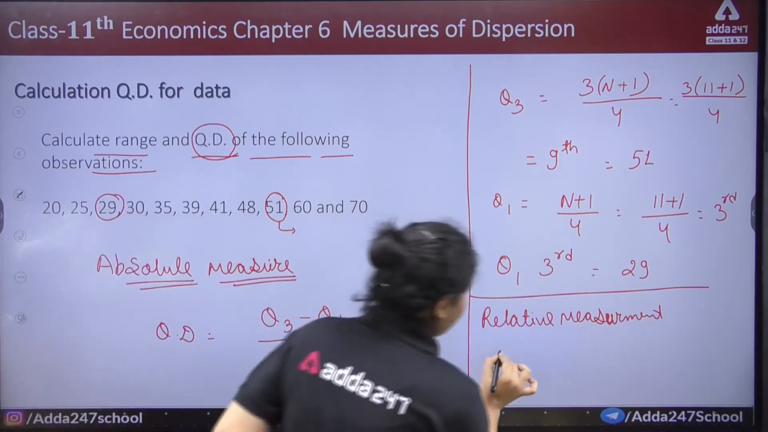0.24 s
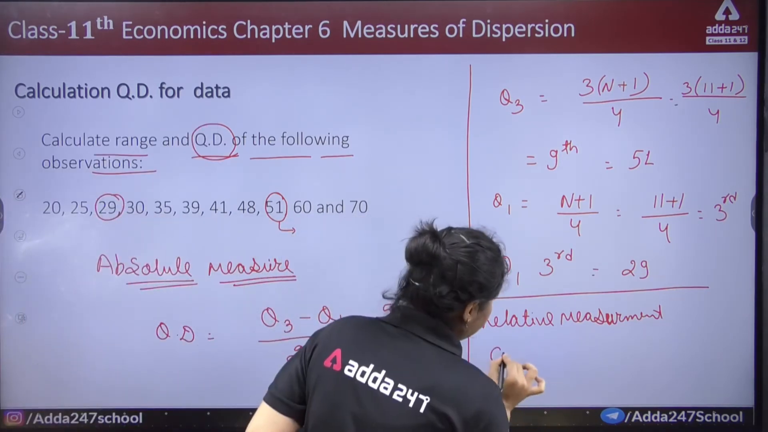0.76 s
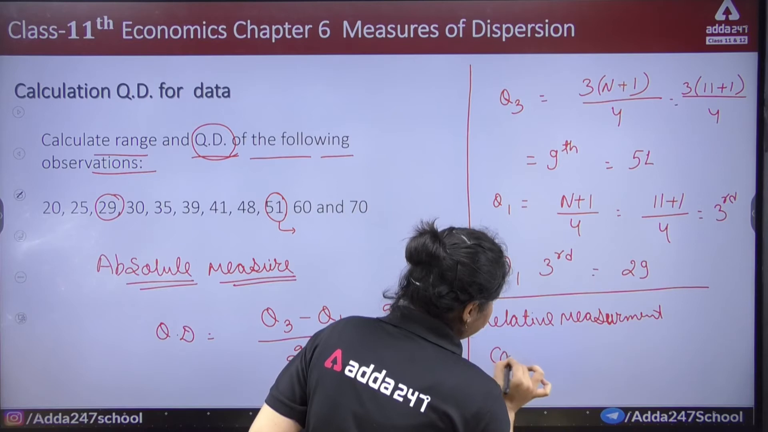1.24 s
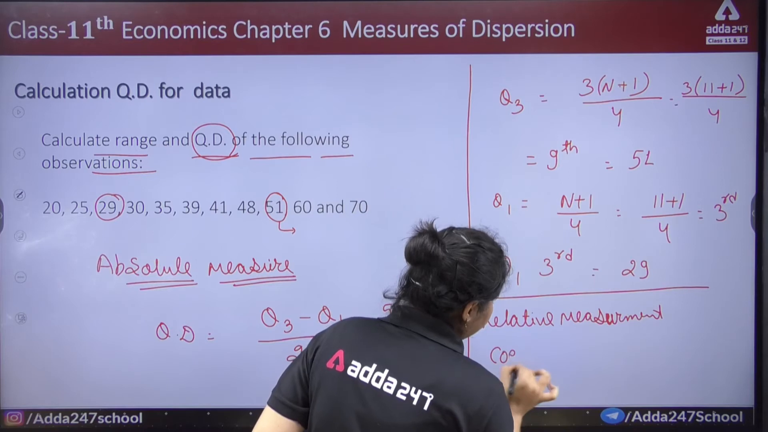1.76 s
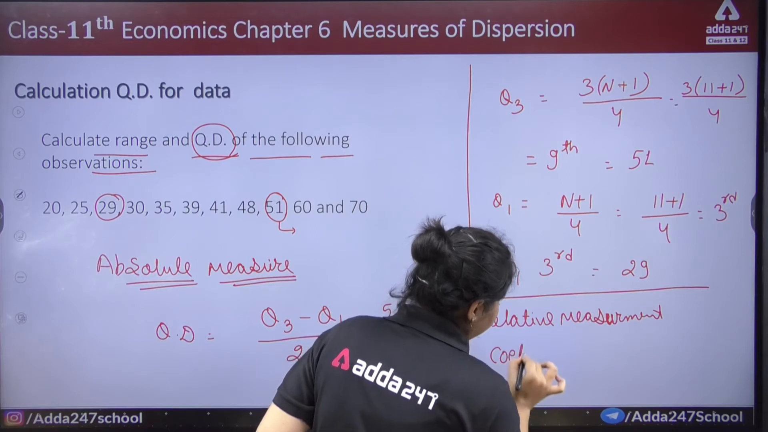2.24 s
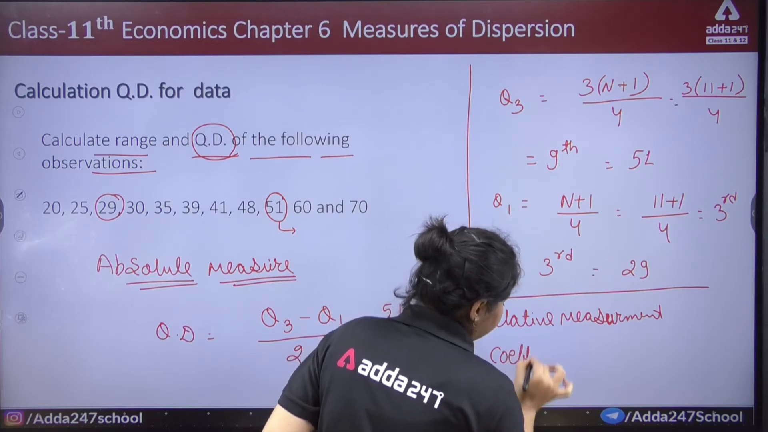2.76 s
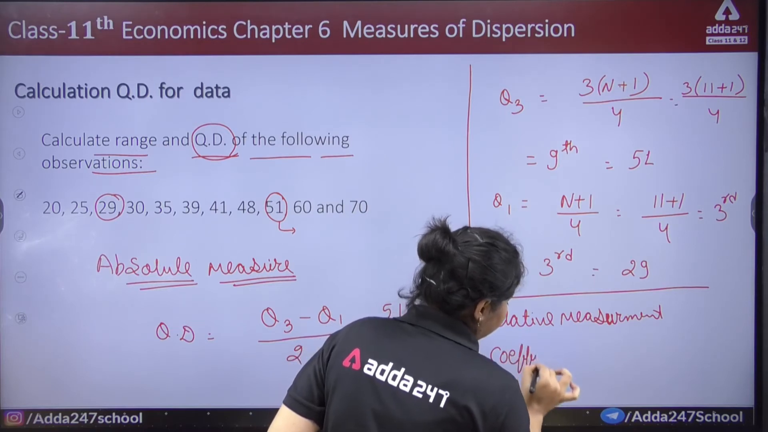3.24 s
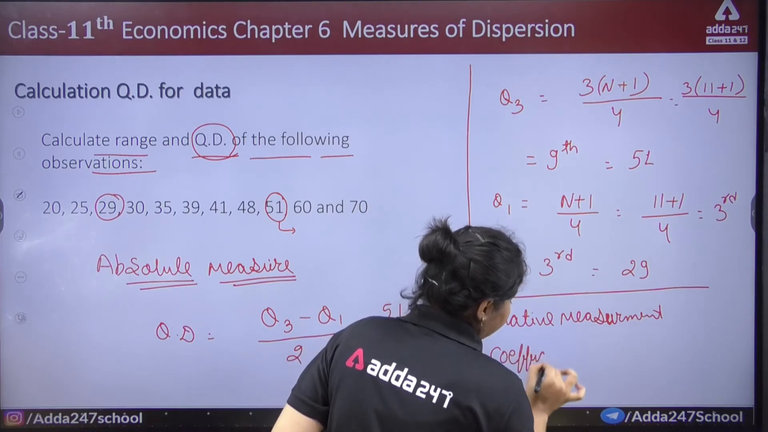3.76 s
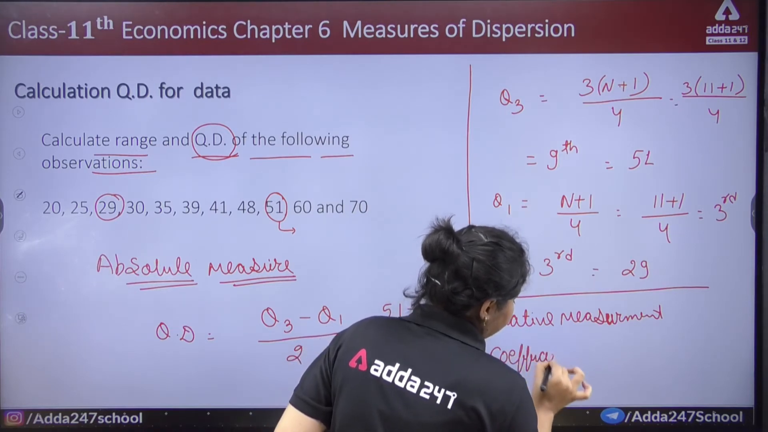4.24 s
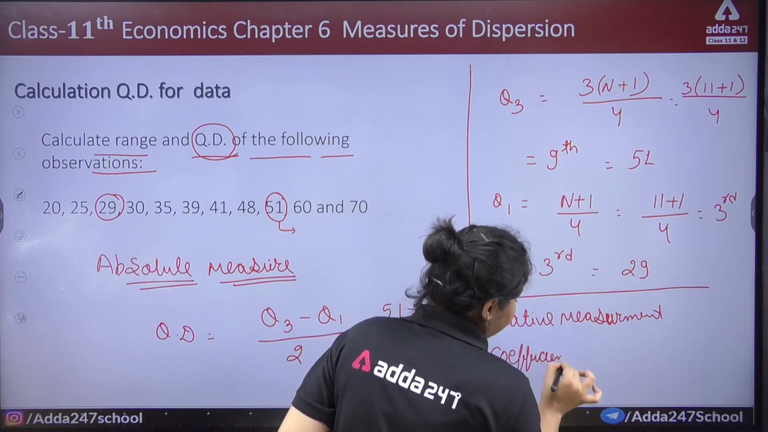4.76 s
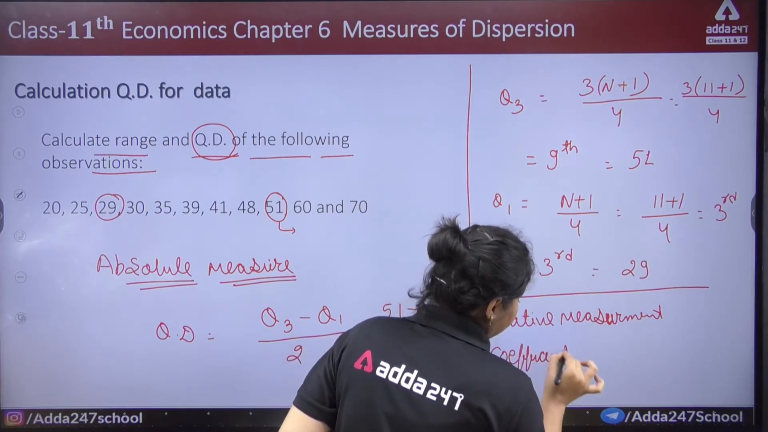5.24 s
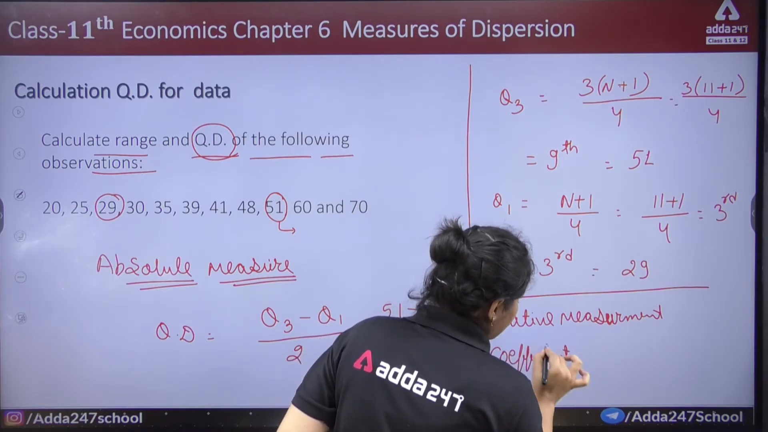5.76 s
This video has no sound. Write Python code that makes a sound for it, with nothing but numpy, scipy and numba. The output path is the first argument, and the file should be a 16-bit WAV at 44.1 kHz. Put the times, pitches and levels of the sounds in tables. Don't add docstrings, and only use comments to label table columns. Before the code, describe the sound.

Faint dry pen drags open over mains hum and airy fan noise, with a few hollow tip taps and a low hand bump on a board panel. From about two seconds, quick up and down strokes hiss brightly, first stronger, then lighter. A far faint horn sounds briefly. Crisp snaps and knocks end it, in a small room heard by one microphone.

```python
import sys
import numpy as np
from scipy import signal
from scipy.fft import rfft, irfft
from scipy.io import wavfile
from scipy.ndimage import uniform_filter1d
from numba import njit

SR = 44100
rng = np.random.default_rng(int(sys.argv[2]) if len(sys.argv) > 2 else 0)


def attenuation_scalar(level_db):
    decades = np.asarray(level_db, float) / 20
    return 10 ** decades


def wav_out(sig):
    wavfile.write(sys.argv[1], SR, np.round(np.clip(np.atleast_2d(sig).T, -1, 1) * 32767).astype(np.int16))


N = 264600
T = np.arange(N) / SR

# level/dB rms, phase/rad
HUM = [(-38, -0.093), (-57, -0.51), (-73.5, 0.34), (-78.5, -0.16), (-73, 0.1)]
RIPPLE_DB = [-20, -16, -20, 0, -20, -26, -25]
LINE_HZ = [1497, 4499, 5334, 8000, 8877, 9115, 9765, 10067]
# early level/dB, late level/dB
LINE_DB = [(-92, -90), (-89, -89), (-91, -83.5), (-96, -83), (-91, -86), (-90, -84.5), (-94, -92),
           (-94, -92)]
# f/Hz, level/dB per Hz
AIR = [(25, -70.5), (75, -79.5), (130, -83.5), (170, -89), (320, -96), (500, -97), (650, -100.5),
       (1000, -102), (1550, -104), (1900, -108), (3500, -110), (5000, -110), (10000, -111), (15500, -109.5)]
# f/Hz, width/Hz, level/dB rms
FAN = [(199.9, 9.4, -68), (275.3, 5.6, -68.5), (349.9, 7.4, -72), (430, 14, -74.5), (472, 7.6, -76),
       (598, 38, -78), (833, 16, -76.5)]
# start t/s, end t/s, f/Hz, level/dB rms
HORN = (2.87, 3.07, 452, -65)
# t/s, peak level/dB, f/Hz, width/Hz, fade to -60 dB/ms
SMALL_CLICKS = [(5.6385, -40, 2800, 550, 5), (5.645, -57, 2500, 1200, 40), (5.6388, -46, 10800, 1500, 4),
                (5.6402, -34, 13500, 2200, 5), (5.6408, -50, 3300, 400, 5), (5.6404, -53, 5300, 400, 5),
                (5.6961, -35, 8500, 3000, 4), (5.6963, -43, 5350, 400, 6), (5.6989, -44, 9500, 4000, 4),
                (5.7012, -32, 9000, 3200, 4), (5.7014, -43, 5250, 500, 5), (5.7012, -46, 2800, 1300, 4),
                (5.6965, -48, 3700, 1200, 4), (5.7084, -48, 8000, 2000, 4), (5.705, -54, 8500, 4000, 40),
                (.8793, -46, 4900, 250, 9), (.8793, -50, 6200, 500, 8), (.8795, -48, 11500, 3000, 6),
                (.9086, -42, 14000, 2500, 4), (.8795, -52, 3000, 2500, 5), (.8952, -47, 2100, 800, 6),
                (2.374, -51, 4000, 5000, 4),
                (0.501, -53.5, 1470, 1400, 210), (1.046, -51.5, 4200, 2000, 8), (1.264, -52, 7600, 1500, 10),
          (1.628, -54, 1350, 300, 42), (1.706, -57, 1490, 1200, 8.5), (1.856, -57, 1300, 500, 12),
          (1.881, -55.5, 1470, 500, 50), (2.30, -54, 850, 200, 40), (5.775, -50, 11600, 2000, 6),
          (5.8, -52, 2520, 1500, 10), (5.806, -50, 2570, 1200, 6.4), (5.8057, -52, 1570, 300, 16),
          (5.8466, -42.5, 1525, 130, 3.6), (5.857, -55, 1600, 400, 26), (5.846, -61, 7000, 600, 6),
          (5.8463, -54, 4500, 900, 5.7), (5.8454, -49, 2900, 900, 5.6)]
# t/s, level/dB, f/Hz, fade to -60 dB/s, rise/ms
BUMPS = [(0.5005, -25.5, 131.8, 0.19, 3.8), (0.5025, -32.5, 185, 0.13, 2.5), (2.378, -47, 120, .1, 4.8),
         (5.807, -31, 248, 0.02, 1.8), (5.847, -34, 107, 0.059, 3.1), (5.86, -46, 200, 0.22, 12),
         (0.001, -44, 145, 0.16, 2.7), (1.2605, -45, 856, 0.034, 1.5), (1.264, -42, 640, 0.031, 1.2),
         (5.846, -46, 620, .03, 1.3)]
# t/s, peak level/dB, contact time/ms, tick level/dB, ring level/dB
TAPS = [
    (0.4281, -28.5, 3.23, -40, -4.5),
    (0.9085, -23, 3.16, -37, -5.5),
    (1.5040, -27, 3.2, -44, -4),
    (5.3938, -29, 3.07, -51, 0),
    (5.7640, -29, 3.14, -47, -1),
]
# f/Hz, level/dB, fade to -60 dB/s
BOARD = [(130, -45.5, 0.23), (206, -73, 0.21), (304, -70, 0.082), (395, -50.5, 0.11), (500, -57, 0.072),
         (610, -40, 0.15), (697, -39, 0.15), (850, -49, 0.063), (1070, -69, 0.041), (1350, -28, 0.028)]
# delay t/ms, level/dB
WALL = [(6.5, -5.5), (11.2, -30.5), (15, -11), (34.5, -16)]
# f/Hz, width/Hz, level/dB
PEN = [
    [(6650, 480, 0)],
    [(4730, 570, -10), (5430, 4100, -2.5)],
    [(7660, 350, 0.5), (8500, 850, -7), (8950, 2500, -4.5)],
    [(10770, 620, 1.5), (11550, 2300, -2.5)],
]
# f/Hz, width/Hz, level/dB
TIP_SKIRT = [(13200, 1200, -3), (14400, 930, -8)]
# t/s, tip f/Hz, upper over middle barrel level/dB, cap clip over low barrel level/dB
LEAN = [(.45, 13700, -1, -11), (.62, 14400, -0.5, -1), (.75, 13700, -1, -2), (1.0, 14200, -5, -4),
        (1.14, 12800, -6, -5.5), (1.8, 13100, -5, 1), (2.0, 13450, -6, 3), (2.9, 13800, -7, -2),
        (3.3, 13600, -8.5, -8), (3.9, 14200, -2.5, -9), (5.2, 13600, -2.5, -12), (5.45, 14600, -12, -12),
        (5.8, 13300, 0, -8)]
# start t/s, length t/s, tip level/dB, barrel over tip level/dB
STROKES = [(1.744, 0.17, -67, 3), (1.87, 0.19, -57.5, -2.5), (2.08, 0.16, -54, -2),
           (2.236, 0.14, -56.5, -1), (2.395, 0.099, -66.5, 0), (2.495, 0.15, -61.5, -1),
           (2.657, 0.16, -56, -1), (2.824, 0.13, -57, -1), (2.98, 0.11, -67.5, 0.5),
           (3.095, 0.14, -68.5, -2), (3.244, 0.13, -65.5, -1.5), (3.386, 0.15, -65, 0),
           (3.548, 0.075, -74, 2), (3.77, 0.13, -64.5, 1.5), (3.901, 0.13, -62, -0.8),
           (4.05, 0.13, -65.5, 3), (4.177, 0.133, -66, 0.5), (4.318, 0.13, -67, 1.5),
           (4.44, 0.13, -68.8, 2.5), (4.574, 0.093, -72, 4.5), (4.707, 0.095, -69, 0),
           (4.827, 0.1, -69.5, 5.5), (4.956, 0.14, -62, 2.8), (5.104, 0.14, -63.5, 3.5),
           (5.414, 0.052, -73.5, 6.5)]
# start t/s, length t/s, tip level/dB, barrel over tip level/dB, peak place/0-1
DRAGS = [(0.0, 0.43, -81, 7.5, 0), (0.285, 0.2, -72.5, 7.5, 0.65), (0.468, 0.3, -64.5, -3, 0.61),
         (0.636, 0.12, -64, 2.5, .6), (0.945, 0.18, -70.5, 6, 0.57), (1.07, 0.18, -66.5, 0, 0.47),
         (1.2, .145, -71.5, 2, 0.53), (1.55, 0.28, -78.5, 2.5, 0.34), (5.77, .1, -78, 3.5, 0.4)]


def level(x, db):
    return x * attenuation_scalar(db) / np.sqrt(np.mean(x ** 2))


def band(x, hz, width_hz):
    return signal.lfilter(*signal.iirpeak(min(hz, 0.45 * SR), hz / width_hz, fs=SR), x)


def walk(rate):
    hold = int(SR / rate)
    steps = np.repeat(rng.standard_normal(N // hold + 1), hold)
    steps = uniform_filter1d(uniform_filter1d(steps, hold), hold)[:N]
    return steps / steps.std()


def fade(t, t60):
    return np.exp(-np.log(1000) * t / t60)


def add(out, s, x):
    i = int(s * SR)
    out[i:i + len(x)] += x[:N - i]


def electrics():
    mains_hz, start_rad, sway_db = 50.088, 1.45, 0.9
    whine_hz, whine_db = 15003.9, -64.5
    turn = 2 * np.pi * mains_hz * T + start_rad
    hum = sum(attenuation_scalar(db) * np.cos((k + 1) * turn + rad) for k, (db, rad) in enumerate(HUM))
    hum = hum * attenuation_scalar(sway_db * walk(7))

    carrier = 2 * np.pi * whine_hz * T + 0.5 * walk(1.3)
    middle = len(RIPPLE_DB) // 2
    whine = sum(attenuation_scalar(whine_db + db) * np.cos(carrier + 2 * (k - middle) * turn)
                for k, db in enumerate(RIPPLE_DB))

    load = np.clip((T - 3.0) / 1.0, 0, 1)
    lines = 0
    for hz, (early, late) in zip(LINE_HZ, LINE_DB):
        line_db = early + load * (late - early) + 1.2 * walk(3)
        lines = lines + attenuation_scalar(line_db) * np.cos(2 * np.pi * hz * T)
    return np.sqrt(2) * (hum + whine + lines)


def air():
    hz, db = np.transpose(AIR)
    f = np.maximum(np.fft.rfftfreq(N, 1 / SR), 1)
    colour = np.sqrt(SR / 2) * attenuation_scalar(np.interp(np.log(f), np.log(hz), db))
    return irfft(rfft(rng.standard_normal(N)) * colour, N) * attenuation_scalar(0.6 * walk(2.5))


def fan():
    return sum(level(band(rng.standard_normal(N), hz, width_hz), db) for hz, width_hz, db in FAN)


def horn():
    start, end, hz, db = HORN
    gate = np.clip(np.minimum(T - start, end - T) / 0.011, 0, 1)
    return np.sqrt(2) * attenuation_scalar(db) * gate * np.sin(2 * np.pi * hz * T)


def clicks():
    out, t = np.zeros(N), T[:4096]
    for s, db, hz, width_hz, ms in SMALL_CLICKS:
        kick = rng.standard_normal(len(t)) * fade(t, ms / 1000)
        kick[0] += 4
        ring = band(kick, hz, 1.2 * width_hz)
        ring = band(ring, hz, min(2.5 * width_hz, hz))
        add(out, s, attenuation_scalar(db) * ring / np.abs(ring).max())
    return out


def bumps():
    out, t = np.zeros(N), T[:SR // 2]
    for s, db, hz, t60, rise_ms in BUMPS:
        rise = 1 - np.exp(-1000 * t / rise_ms)
        add(out, s, -attenuation_scalar(db) * np.sin(2 * np.pi * hz * t) * fade(t, t60) * rise)
    return out


def room_answer(t):
    wash_db, wash_t60_s, wash_hz = -30, 0.31, 400
    wash = band(rng.standard_normal(len(t)), wash_hz, 2 * wash_hz)
    answer = attenuation_scalar(wash_db) * wash * fade(t, wash_t60_s) * np.clip(t / 0.015, 0, 1)
    for ms, db in WALL:
        answer[int(ms * SR / 1000)] += attenuation_scalar(db)
    return answer


def taps():
    rebound = 0.79
    place_db = 3
    t = T[:SR // 2]
    modes = np.array([attenuation_scalar(db) * fade(t, t60) * np.sin(2 * np.pi * hz * t) for hz, db, t60 in BOARD])
    answer = room_answer(t)
    out = np.zeros(N)
    for s, db, ms, tick_db, ring_db in TAPS:
        swing = t[t < ms / 1000] * 1000 / ms
        push = attenuation_scalar(db) * np.sin(2 * np.pi * swing ** rebound) * (1 - swing ** 8)
        add(out, s, push)
        place = attenuation_scalar(place_db * rng.standard_normal(len(BOARD)))
        add(out, s, attenuation_scalar(ring_db) * signal.fftconvolve(push, answer + place @ modes))
        tick = band(rng.standard_normal(400), 8200, 5500) * fade(t[:400], 0.0085)
        add(out, s, attenuation_scalar(tick_db) * tick)
    return out


@njit
def glide(x, hz, width_hz):
    y, b, l = x.copy(), np.zeros(2), np.zeros(2)
    for i in range(len(x)):
        g, k = np.tan(np.pi * hz[i] / SR), width_hz / hz[i]
        for j in range(2):
            v = (b[j] + g * (y[i] - l[j])) / (1 + g * (g + k))
            b[j], l[j], y[i] = 2 * v - b[j], l[j] + 2 * g * v, k * v
    return y


def swell(rows, peaks, fullness, db):
    out = np.zeros(N)
    for (s, length), peak, gain in zip(rows, peaks, attenuation_scalar(db)):
        bend = np.log(0.5) / np.log(np.clip(peak, 0.1, 0.9))
        u = np.arange(0, 1, 1 / (length * SR)) ** bend
        add(out, s, (gain * np.sin(np.pi * u) ** fullness) ** 2)
    return out


def motion():
    lift_s = 0.1
    down_peak, up_peak = 0.59, 0.45
    fullness, barrel_fullness = 0.97, 1.53
    start, length, tip_db, barrel_db = np.transpose(STROKES)
    drags = np.array(DRAGS)
    rows = np.column_stack([start, length])

    order = np.arange(len(start))
    lifted = np.r_[True, start[1:] - start[:-1] - length[:-1] > lift_s]
    up = (order - np.maximum.accumulate(order * lifted)) % 2
    late, even = np.where(up, up_peak, down_peak), np.full(len(start), 0.5)

    def drag(db):
        return swell(drags[:, :2], drags[:, 4], fullness, drags[:, 2] + db)

    rest = attenuation_scalar(2 * np.where((T > 2.7) & (T < 5.28), -79, -81))
    tip = swell(rows, even, fullness, tip_db) + drag(0) + rest
    low_db = -69 + 0.44 * (tip_db + 62.5)
    low = swell(rows, even, fullness, low_db) + drag(drags[:, 3] - 1)
    barrel_drag = drag(drags[:, 3])
    middle = swell(rows, late, barrel_fullness, tip_db + barrel_db) + barrel_drag
    upper = swell(rows, (late + even) / 2, barrel_fullness, tip_db + barrel_db) + barrel_drag
    return np.sqrt([tip, low, low, middle, upper])


def rubbing():
    slip_hz, scatter_db, chatter_db = 9360, 1, 0.5
    grip_db, grip_shift, tip_width_hz = 2.6, 0.018, 2600
    s, tip_hz, upper_db, cap_db = np.transpose(LEAN)
    tip = [(np.interp(T, s, tip_hz), tip_width_hz, 0)] + TIP_SKIRT
    leans = [1, attenuation_scalar(np.interp(T, s, cap_db)), 1, 1, attenuation_scalar(np.interp(T, s, upper_db))]
    chatter = attenuation_scalar(chatter_db * walk(300))
    out = 0
    for modes, speed, lean in zip([tip] + PEN, motion(), leans):
        slips = (rng.random(N) < slip_hz / SR) * rng.standard_normal(N)
        slips = slips * attenuation_scalar(scatter_db * rng.exponential(size=N))
        tilt = 1 + grip_shift * walk(5.99)
        ring = 0
        for hz, width_hz, db in modes:
            grip = attenuation_scalar(db + grip_db * walk(10))
            ring = ring + grip * glide(slips, hz * tilt, 1.46 * width_hz)
        out = out + level(ring * chatter, 0) * speed * lean
    return out


def scene():
    background = electrics() + air() + fan() + horn()
    return (background + clicks() + bumps() + taps() + rubbing())[None]


def band_limit(x):
    return signal.sosfilt(signal.butter(12, 15700, fs=SR, output="sos"), x)


def record(dry):
    offset_db = -37.2
    return band_limit(dry + attenuation_scalar(offset_db))


dry = scene()
out = record(dry)
wav_out(out)
```